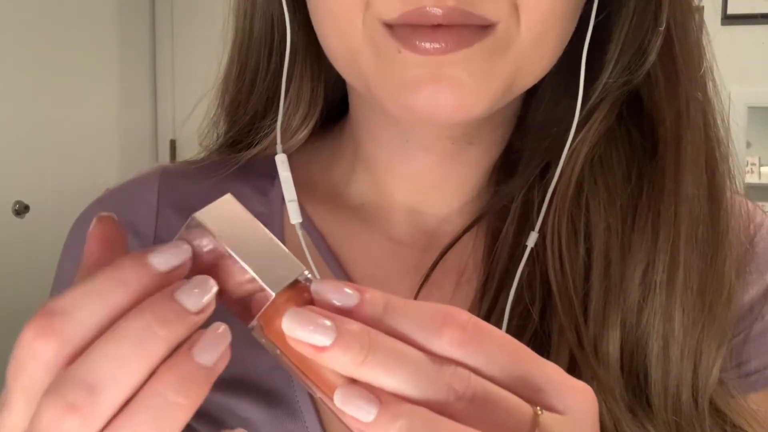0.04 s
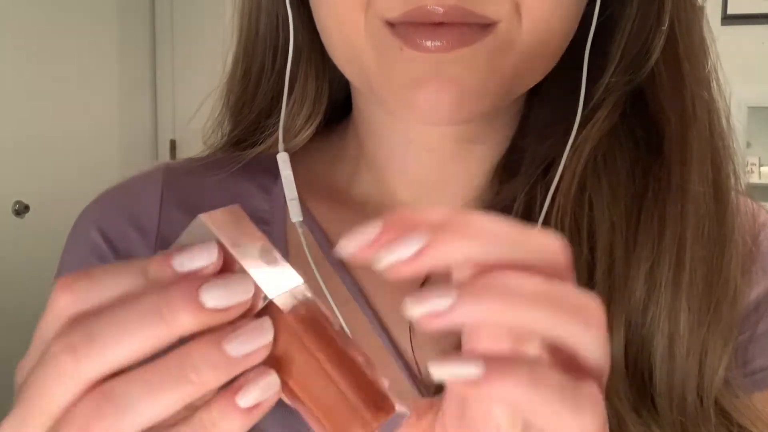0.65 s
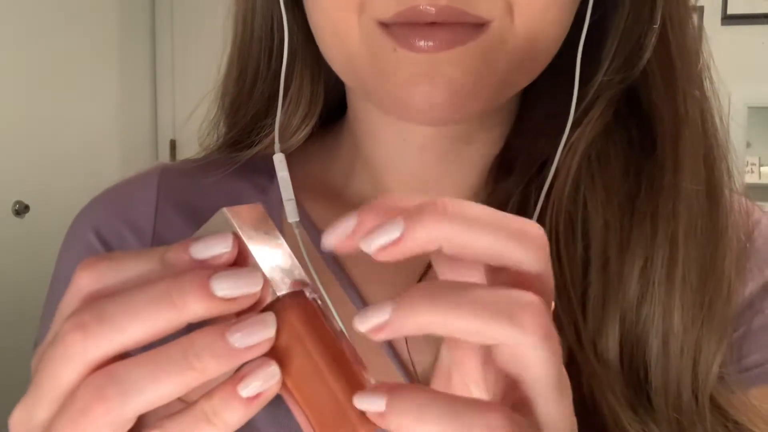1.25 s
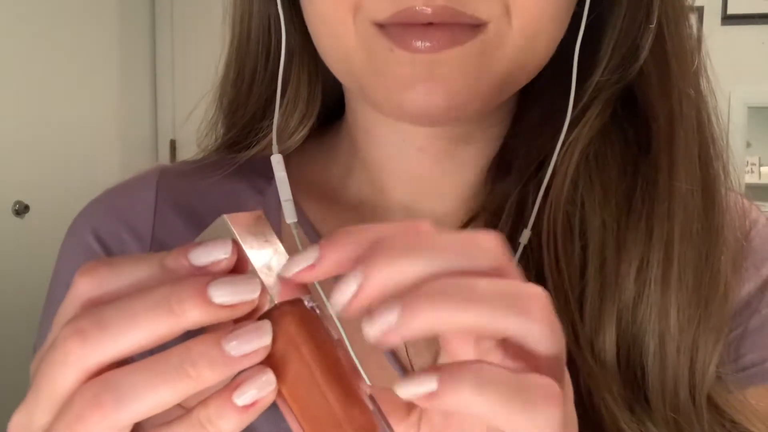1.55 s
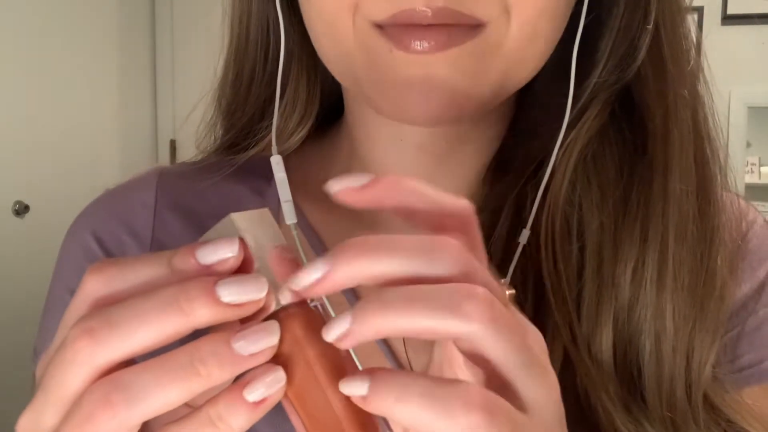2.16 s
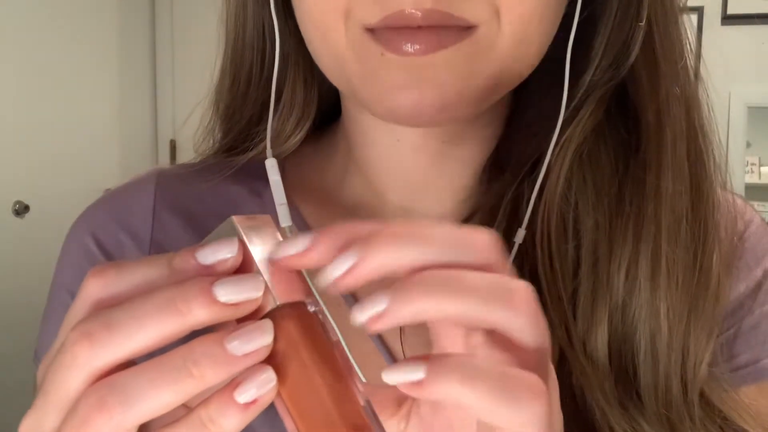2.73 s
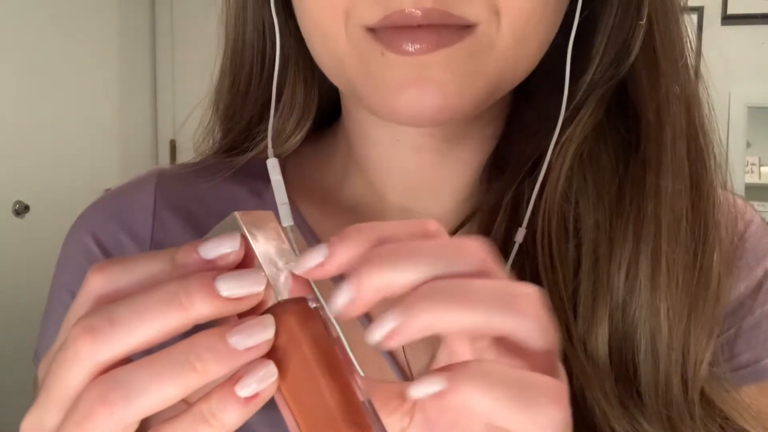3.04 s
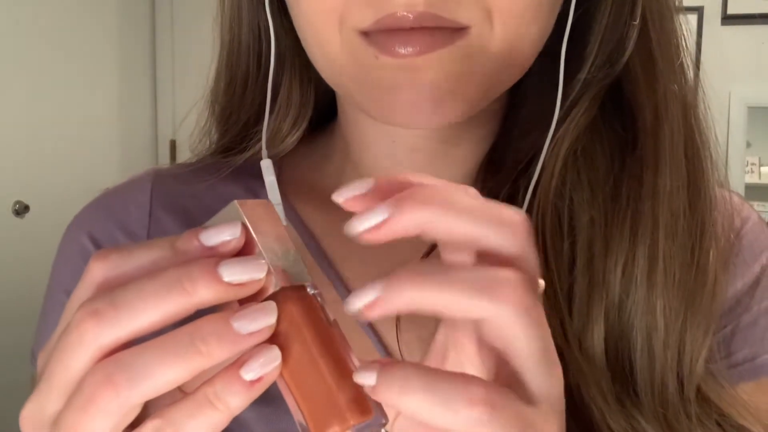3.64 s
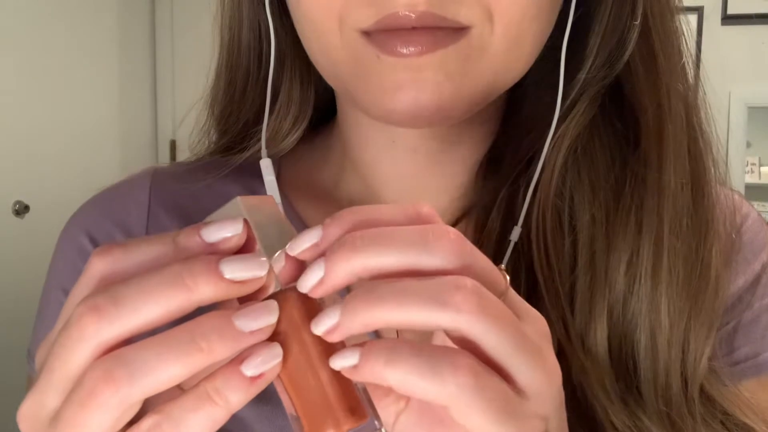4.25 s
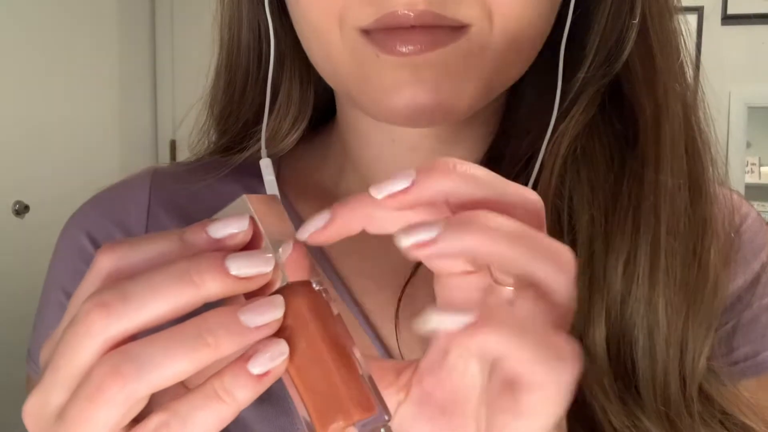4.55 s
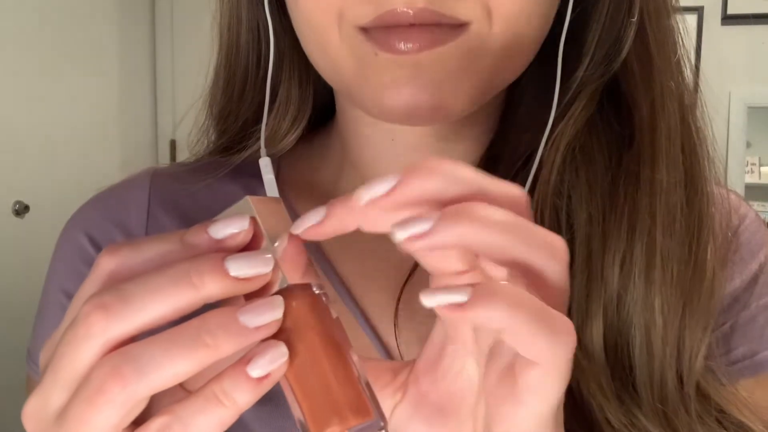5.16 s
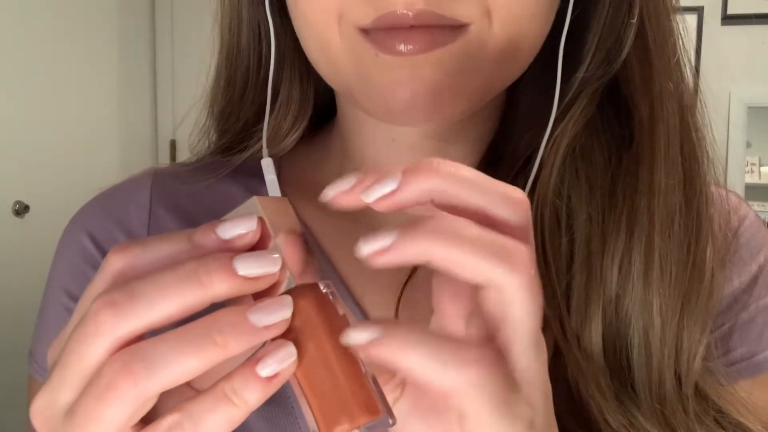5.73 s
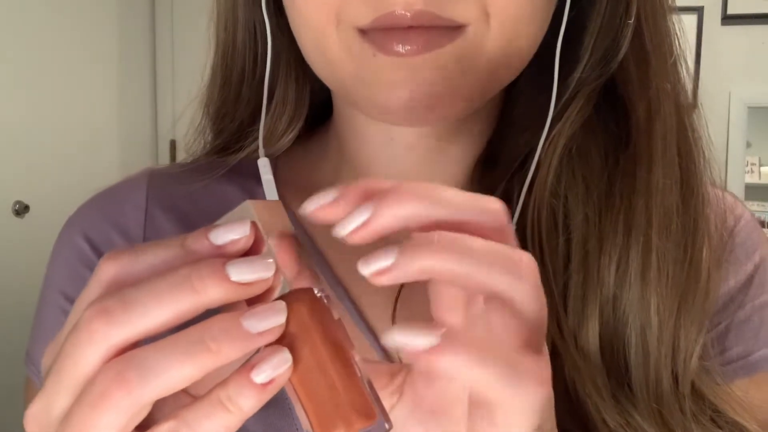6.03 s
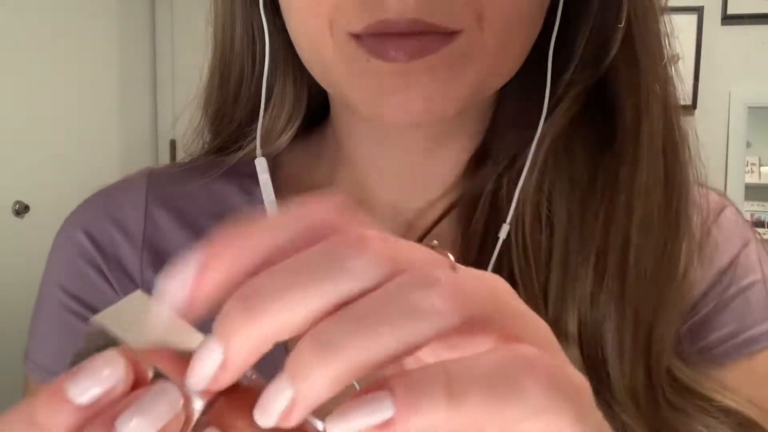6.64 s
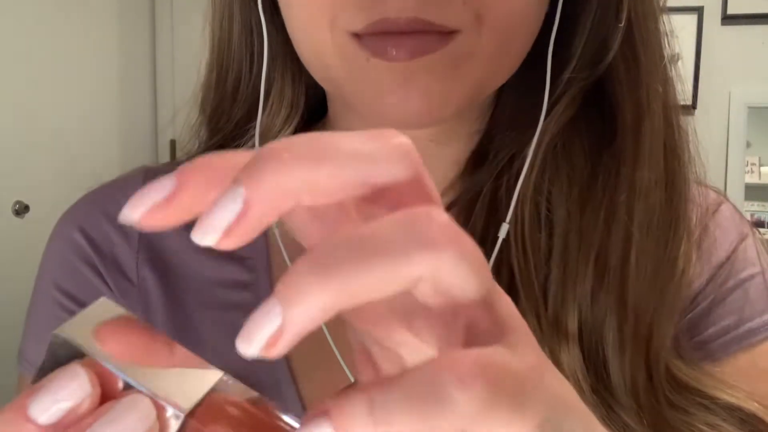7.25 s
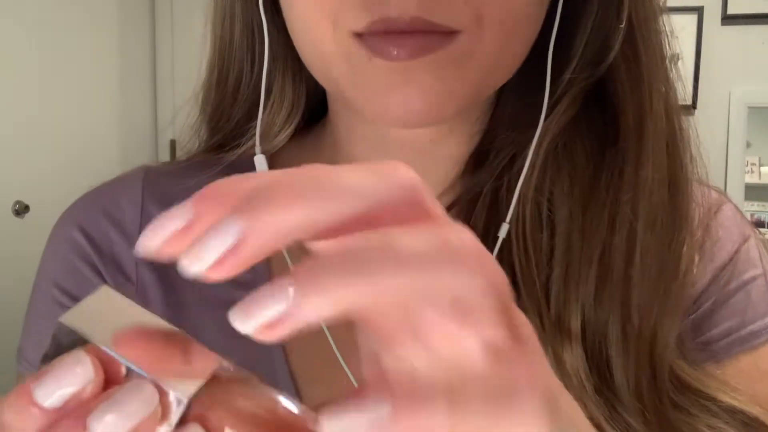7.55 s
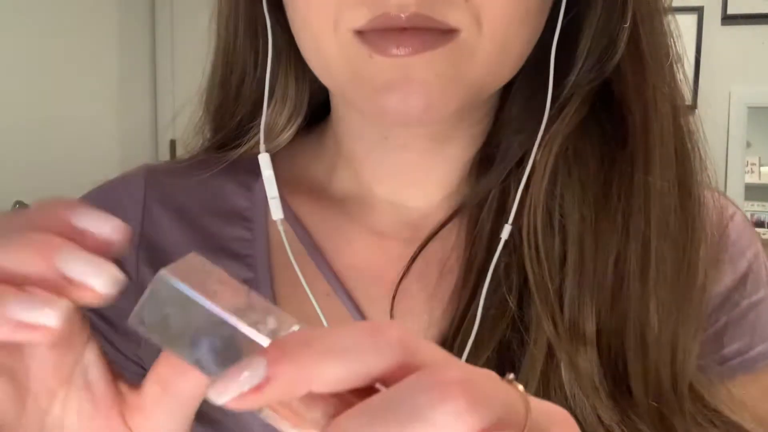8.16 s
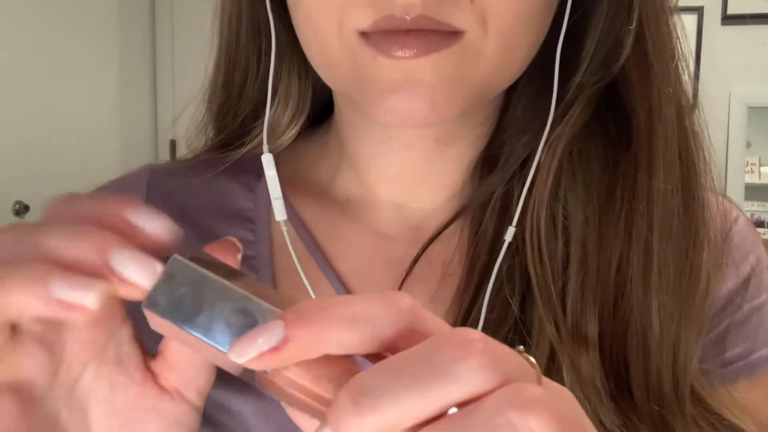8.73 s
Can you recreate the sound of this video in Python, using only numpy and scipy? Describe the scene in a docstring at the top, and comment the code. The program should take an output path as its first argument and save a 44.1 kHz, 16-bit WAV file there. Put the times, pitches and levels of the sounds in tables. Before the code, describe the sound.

Long fingernails tap a small plastic lip gloss tube close to the microphone. A few light clicks on the hollow cap come first. Then the fingers roll over the barrel about twice a second, each roll starting with soft knocks and ending in sharp clicks. The taps return to the cap, pause briefly and finish with a lighter, even run. Faint hiss and hum fill the quiet room.

```python
"""Crisp fingernail taps on the square cap of a small plastic cosmetics tube, close up in a quiet room.
The fingers then roll over the barrel, soft knocks first and sharp clicks last, and return to the cap.
Each tap rings the long nail and the tube for a millisecond or two, scatters between the hands
and dies away in the room. Faint air, hum and low bumps lie underneath."""
import sys
import numpy as np
from scipy import signal
from scipy.fft import rfft, irfft
from scipy.io import wavfile

SR = 44100
rng = np.random.default_rng(int(sys.argv[2]) if len(sys.argv) > 2 else 0)


def wav_out(sig):
    """Save sig, one row per channel (or a flat mono array), as 16-bit PCM at SR to the path in sys.argv[1]."""
    wavfile.write(sys.argv[1], SR, np.round(np.clip(np.atleast_2d(sig).T, -1, 1) * 32767).astype(np.int16))


N = 396459


def undb(db):
    """Decibels to gain."""
    return 10 ** (np.asarray(db) / 20)


def unit(x):
    """Scale to unit energy."""
    return x / np.sqrt(np.sum(x ** 2) + 1e-18)


def add(track, time_s, sound):
    """Mix a sound into the track in place."""
    start = max(int(round(time_s * SR)), 0)
    track[start:start + len(sound)] += sound[:max(len(track) - start, 0)]


def noise(spectrum, size):
    """Unit-rms noise shaped by (frequency [Hz], relative level [dB]) points."""
    hz, db = np.transpose(spectrum)
    bins_hz = np.maximum(np.fft.rfftfreq(size, 1 / SR), 1)
    gain = undb(np.interp(np.log(bins_hz), np.log(hz), db)) * np.minimum(bins_hz / hz[0], 1)
    return unit(irfft(rfft(rng.standard_normal(size)) * gain, size)) * np.sqrt(size)


def ring(hz, width_hz, db, size=512):
    """One mode: builds up, then decays; wider means shorter."""
    t = np.arange(size) / SR
    swing = np.sin(2 * np.pi * (hz * t + rng.random()))
    return undb(db) * unit(t * np.exp(-np.pi * width_hz * t) * swing)


def low_noise(rush_db=-78, rumble_db=-87, drone_db=-73.5, drone_start_s=6.3, drone_rise_s=0.64):
    """Steady room rush, a rumble that swells into dull bumps, a soft drone that fades in and stays."""
    # bell-shaped rumble swells: (time [s], 1/e half-width [s], level [dB])
    bumps = [(3.0, .22, -72.5), (6.1, .18, -72), (8.2, 0.054, -60), (8.5, 0.61, -73)]
    t = np.arange(N) / SR
    rush = noise([(150, -11), (250, 3.5), (400, -0.5), (620, -0.5), (800, -5.5), (1300, -9.5),
                  (3000, -21.5), (12000, -34.5)], N)
    rumble = noise([(25, 0.5), (65, -0.5), (120, -15), (400, -42), (4000, -72)], N)
    drone = noise([(90, -18), (140, 0.5), (170, -10), (200, -3), (300, -13), (4000, -54.5)], N)
    swell = sum(undb(db) * np.exp(-((t - time_s) / width_s) ** 2) for time_s, width_s, db in bumps)
    fade_in = np.clip((t - drone_start_s) / drone_rise_s, 0, 1)
    return undb(rush_db) * rush + (undb(rumble_db) + swell) * rumble + undb(drone_db) * fade_in * drone


def hum():
    """Faint steady tones of mains and appliances."""
    # hum lines: (frequency [Hz], rms level [dB])
    tones = [(119, -79.5), (143, -85.5), (199, -86), (238, -91)]
    t = np.arange(N) / SR
    return sum(undb(db) * np.sqrt(2) * np.sin(2 * np.pi * (hz * t + rng.random())) for hz, db in tones)


def air(level_db=-68.5, whistle_hz=10375, whistle_width_hz=160, whistle_db=-88):
    """Still room air and microphone hiss with a thin whistle in it."""
    # air and hiss spectrum: (frequency [Hz], relative density [dB])
    spectrum = [(20, -7.5), (35, 3.5), (48, -4), (63, -0.5), (85, -0.5), (140, -5), (170, -12), (400, -17),
                (900, -18), (1500, -19.5), (4000, -21.5), (8000, -22), (12000, -22), (16000, -25.5)]
    white = rng.standard_normal(N)
    whistle = signal.fftconvolve(white, ring(whistle_hz, whistle_width_hz, whistle_db, size=2048), "same")
    return undb(level_db) * noise(spectrum, N) + whistle


def room(x, t60_s=0.215, gap_s=0.0008, near_s=0.008, near_db=-16, wall_s=0.03, wall_db=0.5, size=16384):
    """Short diffuse tail with one near reflection and a slight lift when the walls answer."""
    # echo colour: (frequency [Hz], relative level [dB])
    colour = [(200, -5.5), (2000, 3.5), (4500, -2), (7000, -4.5), (9000, 1.5), (10400, -4), (12500, -0.5),
              (16000, -6)]
    t = np.arange(size) / SR
    envelope = np.exp(-np.log(1000) * t / t60_s) * np.clip(t / gap_s - 1, 0, 1)
    tail = unit(noise(colour, size) * envelope * undb(wall_db * (t > wall_s)))
    add(tail, near_s, undb([near_db]))
    return signal.fftconvolve(x, tail)[:N]


def hands(click, scatter_db=-14, gap_s=0.0012, fade_s=0.0013, size=400):
    """The click plus dense early reflections off the moving fingers and palms."""
    t = np.arange(size) / SR
    onset = np.clip(t / gap_s - 1, 0, 1)
    paths = undb(scatter_db) * unit(rng.standard_normal(size) * onset * np.exp(-t / fade_s))
    paths[0] = 1  # direct path
    return np.convolve(click, paths)


def snap(impulses, band_hz=(5100, 13500)):
    """Broadband snap of the contact, which spreads all round the room."""
    return signal.sosfilt(signal.butter(3, band_hz, "band", fs=SR, output="sos"), impulses)


def chatter(skid_s=0.00051, size=512):
    """Micro-impacts as the nail skids on the plastic."""
    # skid spectrum: (frequency [Hz], relative level [dB])
    spectrum = [(500, -50), (2000, -32.5), (4000, -18), (6000, 2), (8000, 0), (13500, 1.5), (16000, -13)]
    t = np.arange(size) / SR
    return unit(noise(spectrum, size) * t * np.exp(-t / skid_s))


def struck_at(modes, spot_hz, off_spot_db=-11, log_reach=0.1):
    """Modes with an antinode under the nail ring fully, the others less."""
    return [(hz, width_hz, db + off_spot_db * (1 - np.exp(-(np.log(hz / spot_hz) / log_reach) ** 2)))
            for hz, width_hz, db in modes]


def body(modes, spread_db):
    """All modes of a part, never excited quite alike twice."""
    return sum(ring(hz, width_hz, db + spread_db * rng.standard_normal()) for hz, width_hz, db in modes)


def tapping(taps, modes, upper_width_hz, lower_width_hz, edge_hz, edge_width_hz,
            chatter_db, spill_db, snap_db):
    """Each tap flexes the nail, rings the shell and jolts the tube; returns (direct, room spill)."""
    # ways a nail meets the tube, levels re the upper nail mode:
    # touch: (upper mode [Hz], lower mode [Hz], lower mode [dB], edge tick [dB], shell [dB], knock [dB])
    touches = {"graze": (10150, 7400.5, 0, 0, -9, -21.5), "flat": (11651.5, 6748.5, -6, -17, -5.5, -12),
               "blunt": (10101, 7601, -1, -5.5, -3, -5.5), "tip": (10299, 7799, -10, -13.5, -15, -31.5),
               "edge": (10748, 8049.5, -8.5, -6, -16, -28), "pad": (11300, 7100, 5, -6, 4, 1.5),
               "glance": (10545, 6303.5, -9.5, -14.5, -18, -33),
               "slant": (11347, 7201, -8.5, -14.5, -11, -28), "peck": (9906, 6852, -8.5, -4.5, -3, -21.5),
               "pat": (9000, 7100, 4, -6, 3, -10.5)}
    # whole tube jolted against the grip: (frequency [Hz], width [Hz], level [dB])
    knock_modes = [(650, 900, -6), (1980, 1150, -13), (3050, 1200, -6.5)]
    knock_share, snap_share = 0.45, 0.2  # fractions of weight_db
    nail_highpass = signal.butter(2, 2500, "high", fs=SR, output="sos")  # a nail radiates no bass
    direct, clicks, impulses = np.zeros((3, N))
    for time_s, touch, strength_db, weight_db, spot_hz in taps:
        upper_hz, lower_hz, lower_db, edge_db, shell_db, knock_db = touches[touch]
        rebound_s = rng.uniform(0.0006, 0.0012)
        nail = ring(upper_hz, upper_width_hz, 0)
        add(nail, rebound_s / 2, ring(lower_hz, lower_width_hz, lower_db + weight_db))  # nail lifts
        add(nail, rebound_s, ring(edge_hz, edge_width_hz, edge_db))  # edge touches again
        shell = undb(shell_db + weight_db) * body(struck_at(modes, spot_hz), spread_db=1)
        knock = undb(knock_db + knock_share * weight_db) * body(knock_modes, spread_db=3.5)
        click = undb(strength_db) * (signal.sosfilt(nail_highpass, nail) + shell + knock)
        add(direct, time_s, hands(click))
        add(direct, time_s, undb(strength_db + chatter_db) * chatter())
        add(clicks, time_s, click)
        add(impulses, time_s, undb([strength_db + snap_share * weight_db]))
    # clicks beam at the microphone, so little reaches the room
    return direct, undb(spill_db) * clicks + undb(snap_db) * snap(impulses)


def cap():
    """Flurries of nail taps on the hollow cap, at the start and the end."""
    # cap taps: (time [s], touch, strength [dB], weight behind the nail [dB], favoured frequency [Hz])
    taps = [(0.0216, "peck", -17, 1.5, 5760), (0.1181, "peck", -16.5, -1.5, 6640),
            (0.199, "peck", -16, -4, 3920), (0.3277, "slant", -37, -5, 5580),
            (6.785, "slant", -26.5, 5.5, 4500), (6.8717, "pat", -26.5, -6.5, 4160),
            (6.9343, "pat", -26, 4, 4030), (7.0127, "slant", -10.5, -3, 4840),
            (7.1598, "slant", -29.5, 4.5, 4450), (7.2636, "flat", -24.5, -2.5, 4100),
            (7.2928, "tip", -6, 3, 4140), (7.3372, "slant", -9.5, -2, 4610), (8.2083, "peck", -19, 3, 5220),
            (8.298, "pat", -28.5, 3, 4140), (8.3821, "pat", -32, -2, 4600), (8.4587, "peck", -13, -3, 3920),
            (8.5558, "pat", -31, -1, 4700), (8.632, "peck", -20.5, 2.5, 5340),
            (8.7259, "pat", -29.5, -0.5, 4170), (8.7978, "peck", -17.5, 2, 5070)]
    # cap shell modes: (frequency [Hz], width [Hz], level [dB])
    modes = [(3640, 480, -6.5), (4430, 830, -1), (6360, 390, 2), (7050, 530, 5), (8320, 310, -1),
             (9840, 3300, 5), (14260, 560, -2.5)]
    return tapping(taps, modes, upper_width_hz=2400, lower_width_hz=930,
                   edge_hz=12700, edge_width_hz=2300, chatter_db=-6, spill_db=-17, snap_db=-9)


def barrel():
    """Finger rolls on the barrel, whose shell is damped by the grip."""
    # barrel taps: (time [s], touch, strength [dB], weight behind the nail [dB], favoured frequency [Hz])
    taps = [(0.7453, "graze", -30, -1, 4650), (0.7934, "flat", -26.5, 0, 4800),
            (0.8484, "blunt", -28, -1, 4500), (0.9232, "tip", -9.5, 8.5, 5300),
            (1.1769, "graze", -37.5, 1, 6000), (1.2669, "flat", -24, 0.5, 4500),
            (1.3076, "blunt", -23, -1, 5800), (1.4057, "edge", -4.5, -3, 4370),
            (1.598, "graze", -34, 2.5, 4830), (1.6802, "flat", -23.5, -1, 4600),
            (1.7229, "tip", -2, -1.5, 5340), (1.7746, "tip", -9, 3.5, 5860),
            (2.0118, "graze", -34, 6, 5210), (2.0744, "flat", -22.5, 2, 4630),
            (2.1201, "tip", -3.5, 6, 5920), (2.2019, "glance", -18.5, 4.5, 5470),
            (2.4088, "graze", -31.5, 0.5, 5330), (2.4865, "flat", -24.5, 3, 4700),
            (2.5222, "tip", -3.5, 6.5, 5530), (2.5721, "glance", -28, 4, 6120),
            (2.7729, "graze", -31, 0, 4860), (2.8613, "flat", -24.5, 1, 4520),
            (2.893, "blunt", -21, 4, 6650), (2.9486, "tip", 0, -5.5, 4800),
            (3.1662, "graze", -32.5, -3, 5380), (3.2498, "flat", -24, -1, 4570),
            (3.274, "blunt", -20.5, -0.5, 6370), (3.3526, "tip", -0.5, -7.5, 4230),
            (3.5423, "graze", -37, -4.5, 4010), (3.6423, "flat", -26.5, -0.5, 4470),
            (3.6661, "edge", -2.5, 0, 5120), (3.7126, "tip", -4, -1, 5660),
            (3.9122, "flat", -26.5, -0.5, 4420), (3.9643, "flat", -26, 0, 4420),
            (3.9924, "blunt", -21.5, -2, 4320), (4.0654, "tip", -10.5, 1.5, 5050),
            (4.5759, "flat", -25, -8, 4500), (4.6659, "flat", -23.5, -0.5, 4570),
            (4.7247, "tip", -6, 0.5, 3860), (4.7944, "glance", -12, 1, 6500),
            (5.2542, "flat", -26.5, -8.5, 4930), (5.3448, "pad", -36.5, 1, 4560),
            (5.3949, "edge", -0.5, -3, 4210), (5.4637, "glance", -9, 0, 4680),
            (5.708, "flat", -26, -6, 3200), (5.7794, "pad", -33.5, -1, 4800),
            (5.8168, "edge", -5, -0.5, 4100), (5.8901, "glance", -8, -2, 6030),
            (6.0666, "graze", -34.5, 1.5, 4750), (6.1101, "flat", -28.5, 2, 4800),
            (6.1442, "tip", -3, 4.5, 6700), (6.2189, "glance", -5, -5, 6100),
            (6.5464, "flat", -26, 9, 4330), (6.6132, "slant", -12.5, -1.5, 5470)]
    # barrel shell modes: (frequency [Hz], width [Hz], level [dB])
    modes = [(2428, 680, -15), (3544, 640, -4), (4080, 690, 1), (4567, 670, -0.5), (5350, 690, 2),
             (6050, 750, 0.5), (7450, 540, 1.5), (9530, 1300, 5), (12600, 632, -14.5)]
    return tapping(taps, modes, upper_width_hz=1910, lower_width_hz=1600,
                   edge_hz=13000, edge_width_hz=2200, chatter_db=-13, spill_db=-19.5, snap_db=-12)


def scene():
    """Close barrel and cap taps with a little room behind them; mono."""
    barrel_direct, barrel_spill = barrel()
    cap_direct, cap_spill = cap()
    echo = room(barrel_spill + cap_spill)
    background = low_noise() + hum() + air()
    return (barrel_direct + cap_direct + echo + background)[None]


def record(dry):
    """Steep low-pass on the top treble."""
    cutoff_hz = 16200
    return signal.sosfilt(signal.ellip(10, 0.2, 70, cutoff_hz, fs=SR, output="sos"), dry)


dry = scene()
out = record(dry)
wav_out(out)
```